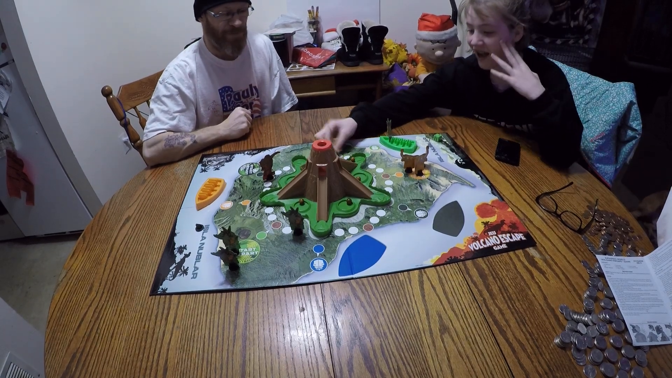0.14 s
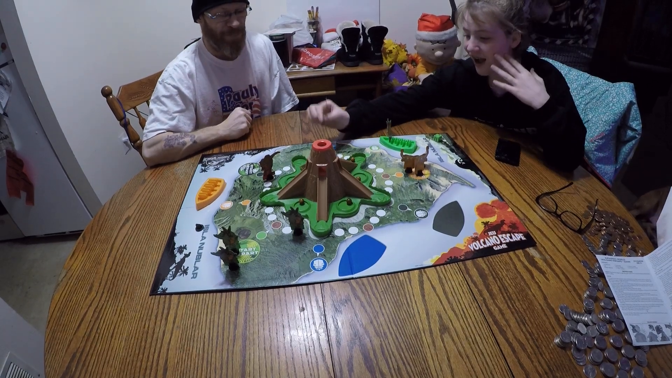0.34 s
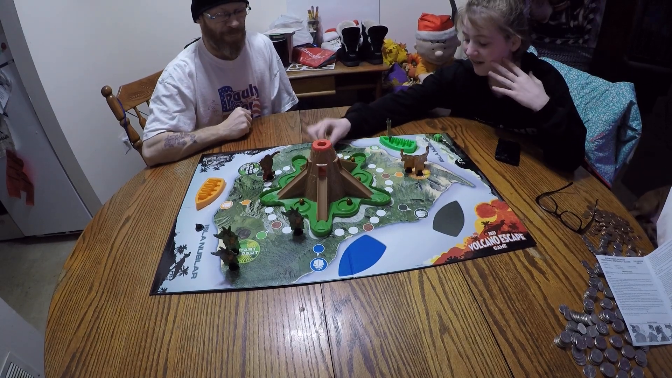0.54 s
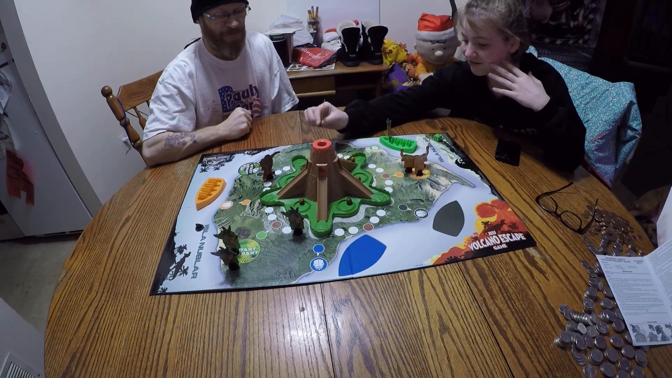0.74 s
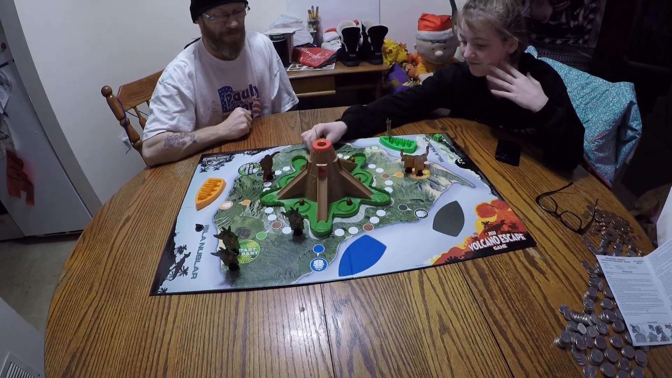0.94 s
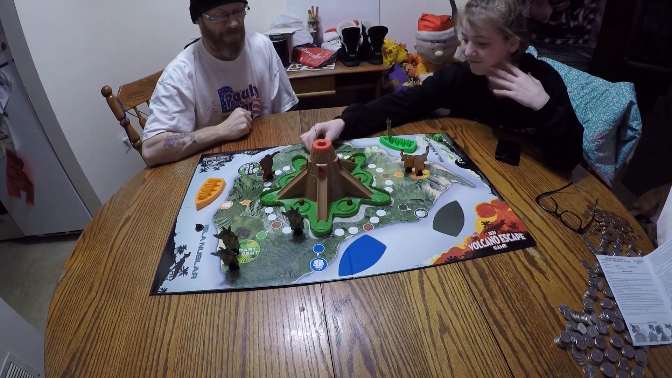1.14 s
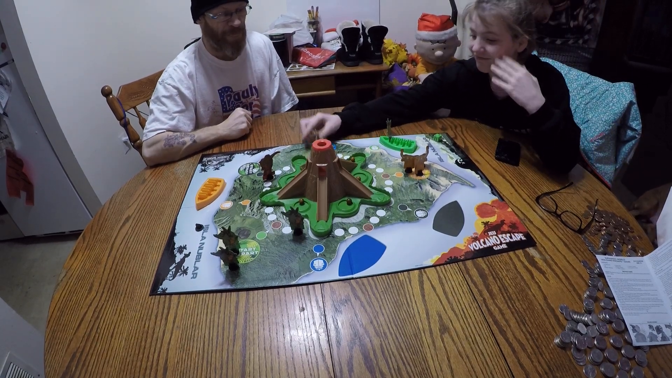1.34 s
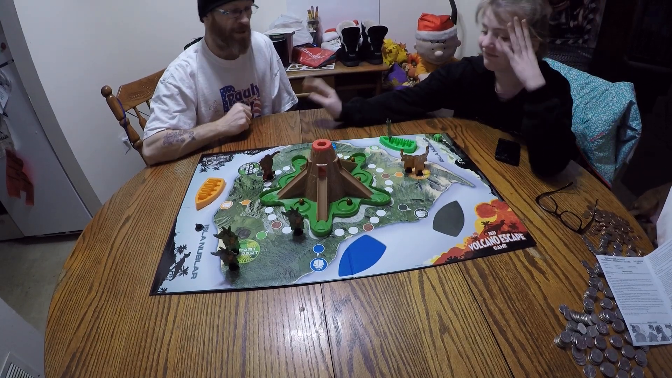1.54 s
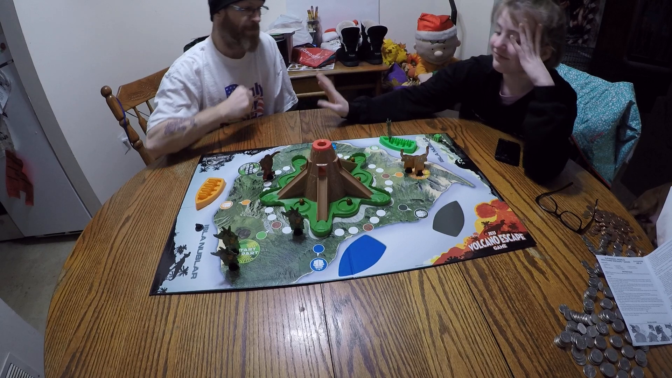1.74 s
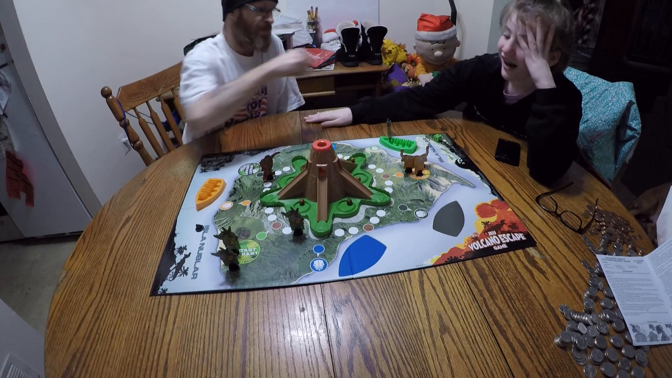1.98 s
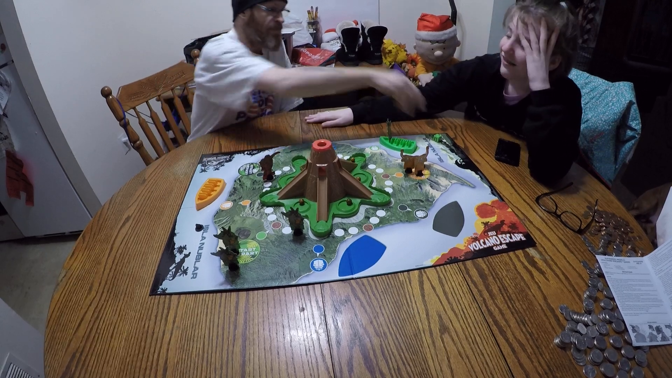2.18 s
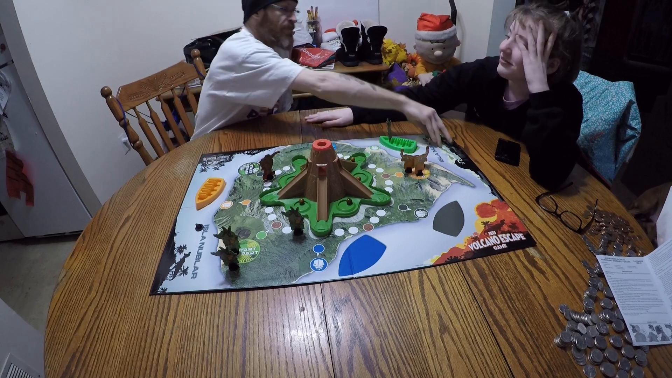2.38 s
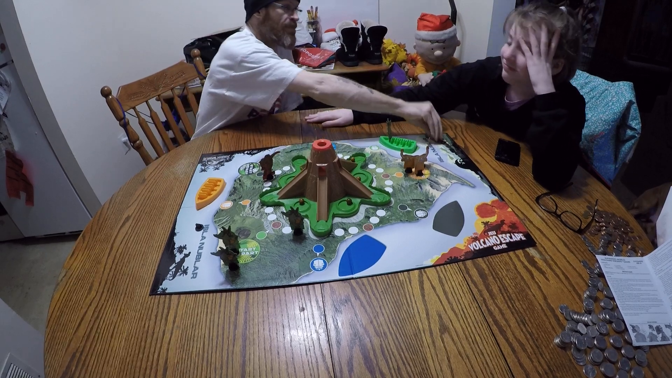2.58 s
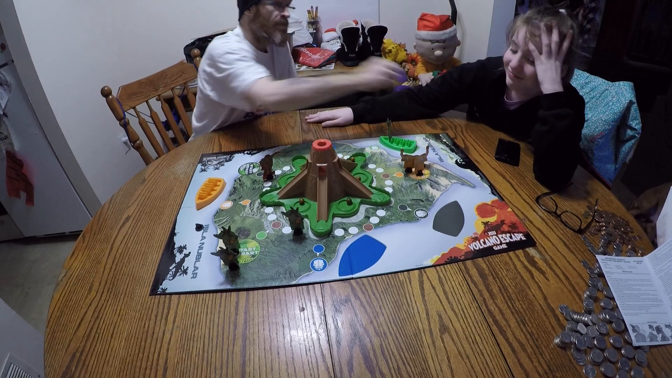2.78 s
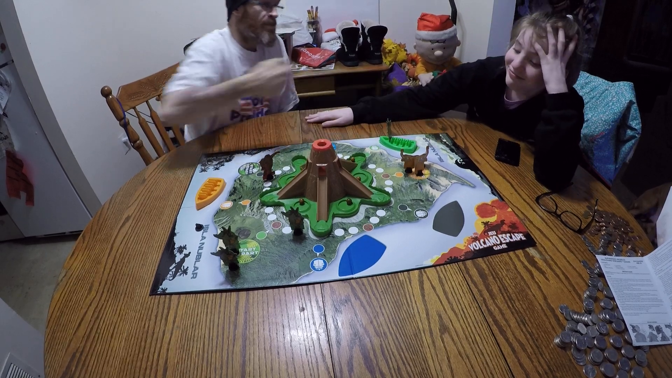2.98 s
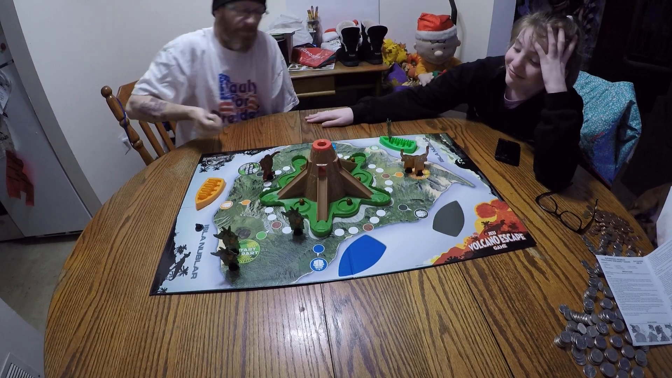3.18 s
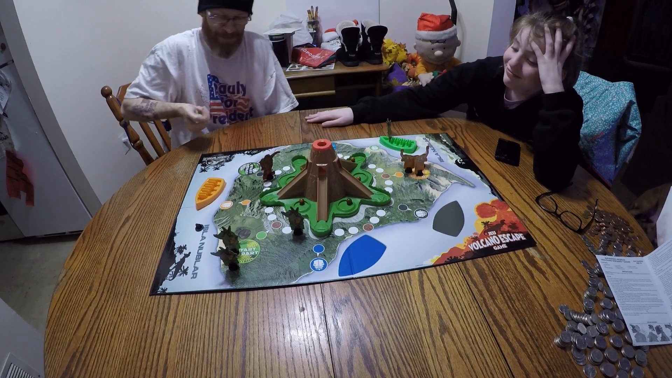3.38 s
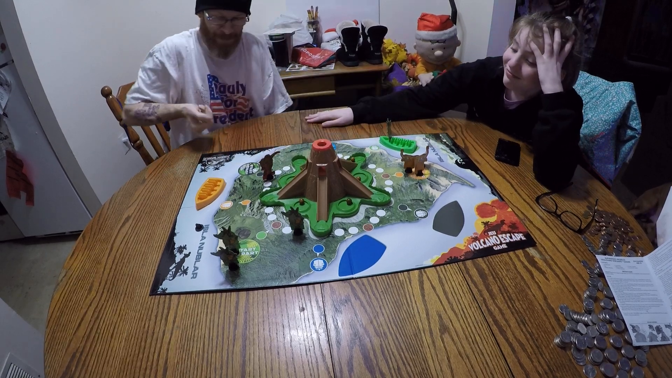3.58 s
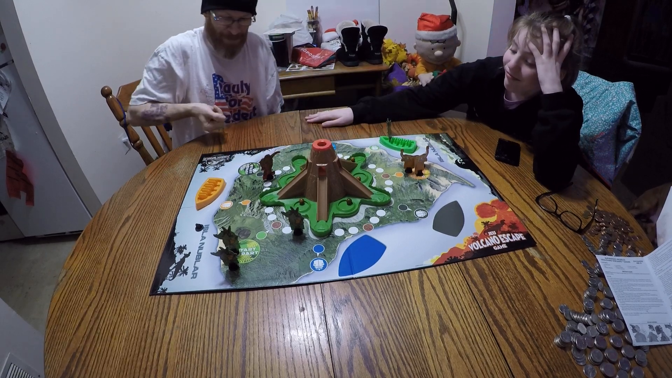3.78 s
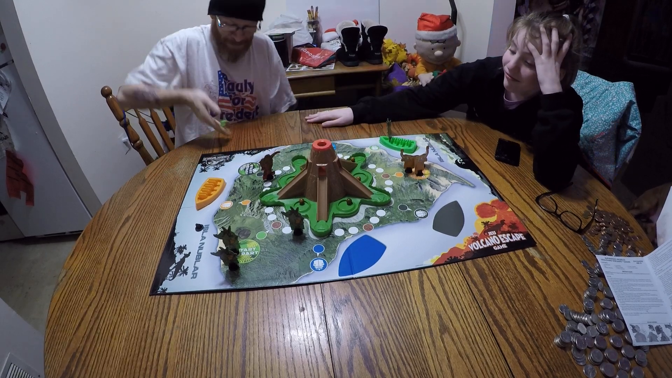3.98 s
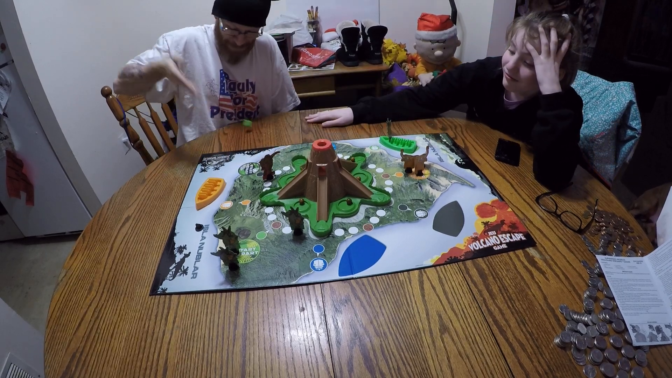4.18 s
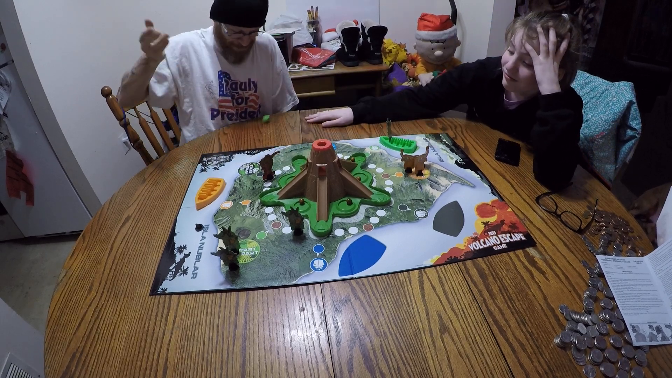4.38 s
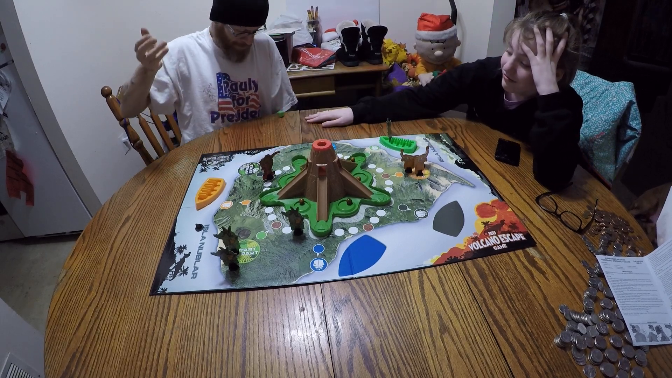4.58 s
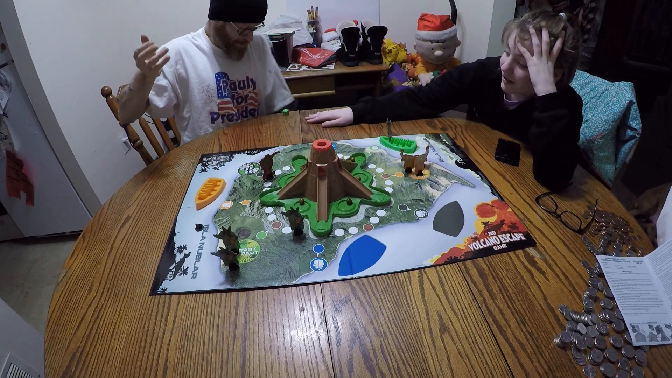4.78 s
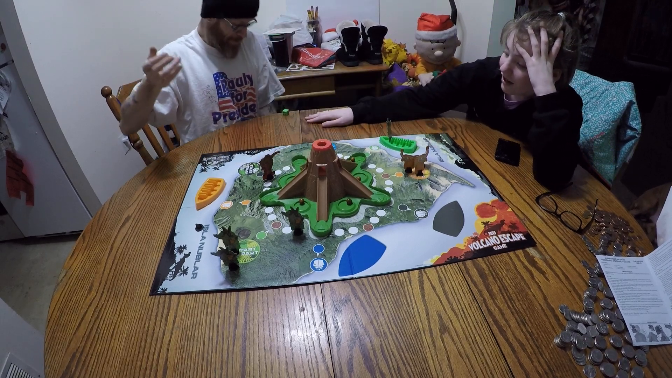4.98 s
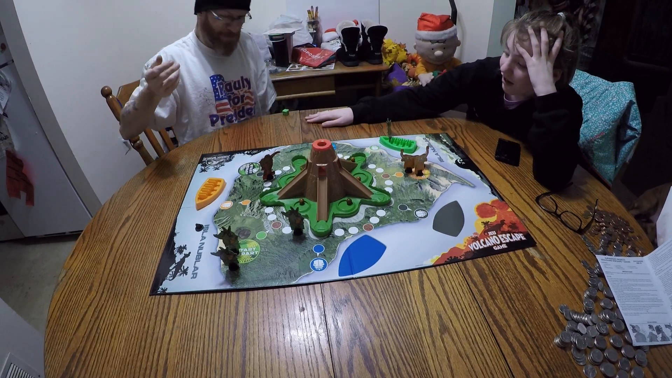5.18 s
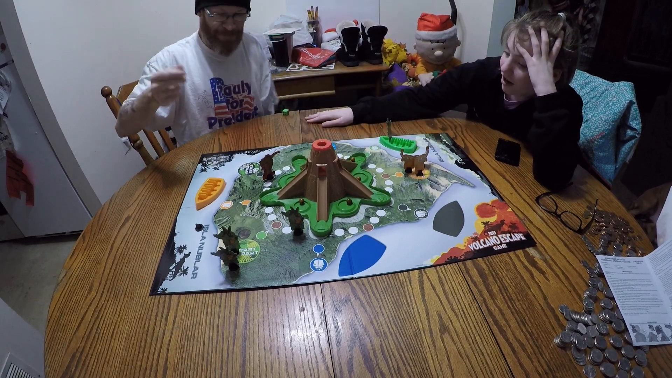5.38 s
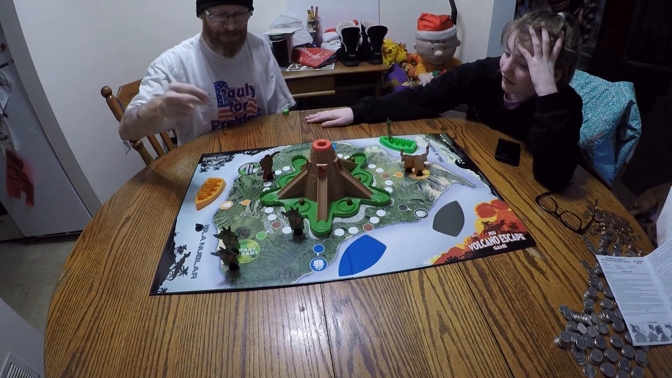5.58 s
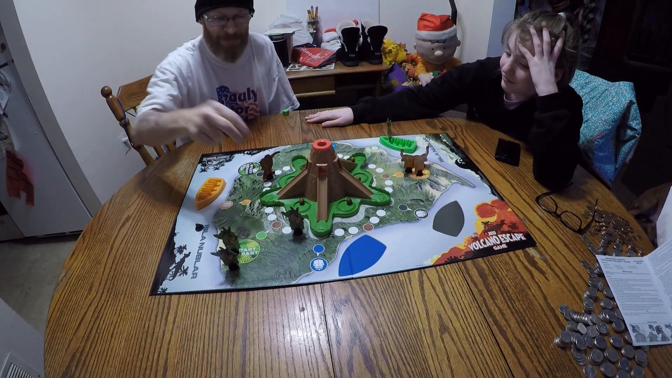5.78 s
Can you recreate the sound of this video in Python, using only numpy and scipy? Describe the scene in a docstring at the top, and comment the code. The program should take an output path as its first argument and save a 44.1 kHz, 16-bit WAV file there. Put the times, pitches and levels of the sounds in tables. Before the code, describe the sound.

A small, quiet room at home with a faint low hum, soft rumble and a very thin hiss throughout. Near 0.1 s a sleeve brushes softly with faint taps. A plastic pawn steps on the board at 0.5 s, with a low thud beneath, and more clearly at 0.9 s, each a small double click with a woody ring. From about 1.6 s come dull hand and forearm knocks and cloth rustle, strongest near 1.9 s, where the table shudders deeply; smaller muffled bumps follow at 2.3, 2.4 and 2.7 s. Then only room tone until 4.1 s, when a hard die strikes bare wood, by far the loudest sound. It bounces at 4.25, 4.33 and 4.39 s, weakening, then rolls with a short hollow rumble and ticks from about 4.45 to 4.75 s, with small clacks near 4.6 to 4.7 s. A short echo fades and the quiet hum remains to the end.

```python
"""Board game on a wooden table

A plastic pawn is stepped along the board; dull knocks of hands and forearms, and one under a pawn step,
sound on the table, which shudders. Sleeves brush past; a die bounces, rolls, clacks and rocks to rest.
Contacts are decaying noise bands beside ringing modes of the table top; thuds are damped sines.
Slow modes of the whole table give the shudder, shaped noise the cloth, and the small room hums faintly."""
import sys
import numpy as np
from scipy import signal
from scipy.io import wavfile

SR = 44100
rng = np.random.default_rng(int(sys.argv[2]) if len(sys.argv) > 2 else 0)


def int16_out(signal):
    """Quantize to a 16-bit WAV file."""
    q = np.round(np.clip(np.atleast_2d(signal).T, -1, 1) * 32767)
    wavfile.write(sys.argv[1], SR, q.astype(np.int16))


N = 256920
TIME = np.arange(N) / SR
AGE = np.arange(SR // 2) / SR   # time since a contact (s)
EDGES = np.geomspace(18, 17000, 29)   # band limits (Hz)
CENTRES = np.sqrt(EDGES[1:] * EDGES[:-1])
BANK = [signal.butter(2, band, "band", fs=SR, output="sos") for band in zip(EDGES, EDGES[1:])]

# Bounces of the die on the bare table top.
# Each row: start in seconds, clack level in dB, contact hardness as a low-pass cutoff in Hz.
DIE_BOUNCES = [(4.1056, -6.5, 7840), (4.251, -8.5, 3560), (4.326, -10.5, 5980), (4.3879, -13.5, 6600),
               (4.4505, -20, 4100), (4.6009, -18, 7400), (4.6536, -25, 4400), (4.717, -30, 3500)]
# Steps of the pawn on the board.
# Each row: start in seconds, clack level in dB, contact hardness (cutoff) in Hz, table ring in dB.
PAWN_TAPS = [(.139, -43, 3000, -46), (0.4986, -25, 5730, -32), (.8922, -21, 6900, -19.5),
             (1.576, -42, 2380, -40), (1.855, -41.5, 4500, -30), (2.445, -44.5, 3000, -57)]
# Dull thuds on the table: hands and arms landing, and the low thud under a pawn step.
# Each row: start in seconds, thud level in dB, contact hardness (cutoff) in Hz, thud pitch in Hz.
DULL_KNOCKS = [(.117, -37.5, 550, 380), (.231, -40, 1680, 272), (.501, -24, 480, 251),
               (.663, -41, 900, 248), (1.584, -31.5, 720, 363), (1.823, -40.5, 1900, 300),
               (1.85, -34, 1400, 297), (1.908, -26.5, 550, 332), (1.933, -33, 2700, 330),
               (1.9386, -21, 1650, 200), (2.31, -39, 700, 282), (2.433, -26.5, 332, 336),
               (2.702, -36, 450, 207)]
# Modes of the table top, which each kind of contact stirs differently.
# Each row: frequency in Hz, T60 in seconds, level in dB for the pawn, for the die, for the dull knocks.
TOP_MODES = [(164.7, 0.2484, -40, -27, -18), (249, 0.19, -19.5, -19, -16), (274.8, 0.23, -14.5, -26.5, -9),
             (387.2, 0.21, -24, -18, -23.5), (417, 0.2, -41, -16.5, -23), (505.6, 0.14, -16, -11, -1.5),
             (569, .12, 4.5, -5.5, -10), (597.2, .105, 5, 5.5, -1.5), (603, .5, -20, -58, -40),
             (624, 0.051, -11, -5.5, -0.5), (649, 0.13, -0.5, -6.5, -27.5), (709.7, 0.12, -1, -8.5, 1),
             (761, 0.121, -15, -16, -6.5), (886, 0.083, -30, -1.5, -1), (954, 0.081, -48, -6.5, -18),
             (1035.6, 0.1, -26, -12.5, -13), (1280, 0.15, -17, -18.5, -27), (1543, .11, -61, -14.5, -32),
             (1784, .12, -17, -16, -22), (2274, 0.06, -54, -21.5, -10), (2493, 0.1, -18, -22.5, -15),
             (2660, .15, -29, -15, -16), (3036, .12, -28, -19.5, -20.5)]
# Each spot's rows: frequency in Hz, level in dB, T60 in seconds.
PAWN_SPOT, DIE_SPOT, KNOCK_SPOT = (np.array(TOP_MODES)[:, [0, column, 1]] for column in range(2, 5))

# between its last bounces the die rolls, over this span (s)
ROLL_START_S, ROLL_STOP_S = 4.465, 4.745


def from_db(db):
    """Amplitude ratio: 20 dB is a factor of ten."""
    return 10 ** (np.asarray(db) / 20)


def at_hz(points, hz):
    """Interpolation along logarithmic frequency, held level beyond the end points."""
    known_hz, values = np.transpose(points)
    return np.interp(np.log(hz), np.log(known_hz), values)


def dying(t60):
    """Exponential decay: the level falls 60 dB in the time t60."""
    return from_db(-60 * AGE / t60)


def add(track, s, sound):
    """Superposition: a sound is summed in at time s."""
    start = max(round(s * SR), 0)
    track[start:start + len(sound)] += sound[:N - start]


def noise_bands(size):
    """Band-filtered noise: bands of about a third of an octave, each of rms 1."""
    white = rng.standard_normal((2, size + SR // 10))   # neighbouring bands take different noise
    bands = np.array([signal.sosfilt(sos, white[k % 2])[-size:] for k, sos in enumerate(BANK)])
    return bands / bands.std(axis=1, keepdims=True)


def band_gains(colour):
    """Spectral density times bandwidth gives band power; the total is set to 1."""
    gains = from_db(at_hz(colour, CENTRES)) * np.sqrt(np.diff(EDGES))
    return gains / np.linalg.norm(gains)


def ring(modes, spread_db, rise_s):
    """Modal superposition: damped sines swell as bending waves fill the wood."""
    hz, level_db, t60 = np.transpose(modes)
    gains = from_db(level_db + spread_db * rng.standard_normal(len(hz)))
    waves = np.sin(2 * np.pi * (hz[:, None] * AGE + rng.random((len(hz), 1))))
    swell = 1 - np.exp(-(AGE / rise_s) ** 2)
    return gains @ (waves * dying(t60[:, None])) * swell


def clack(colour, t60, crack_db, crack_t60, rise_cycles):
    """High modal density: a brief crack, then crowded short modes act as noise; the lows start later."""
    decay = dying(t60) + from_db(crack_db) * dying(crack_t60)
    rise = 1 - np.exp(-AGE * CENTRES[:, None] / rise_cycles)
    shape = decay * rise
    bands = noise_bands(len(AGE)) * shape
    # each band gets exactly the energy of its envelope
    bands *= np.linalg.norm(shape, axis=1, keepdims=True) / np.linalg.norm(bands, axis=1, keepdims=True)
    return band_gains(colour) @ bands


def contacts(rows, modes, colour, t60, crack_db, crack_t60, rise_cycles, swell_s, edge_db, order):
    """Impact excitation: a softer, longer touch loses its treble, in the clack and in the wood."""
    out = np.zeros(N)
    for s, clack_db, hardness_hz, ring_db in rows:
        blow = from_db(clack_db) * clack(colour, t60, crack_db, crack_t60, rise_cycles)
        wood = from_db(ring_db) * ring(modes, spread_db=3.5, rise_s=swell_s)
        softness = signal.butter(order, np.clip(hardness_hz, 100, .45 * SR), fs=SR, output="sos")
        add(out, s, signal.sosfilt(softness, blow + wood))
        add(out, s, from_db(edge_db) * blow)   # a hard corner keeps a trace of treble
    return out


def die_contacts(unevenness):
    """Impact series: the bounces, and the fading ticks of the corners while the die rolls."""
    # the wood's ring under a full-scale clack (dB), and the share of the clack's fall that it follows
    ring_top_db, ring_follows = -8.5, .58
    rows = [(s, db, hz, ring_top_db + ring_follows * db) for s, db, hz in DIE_BOUNCES]
    ticks_per_s, tick_db, fade_db_per_s, hardness_hz = 33, -21, 80, 2120
    tick_ring_db = -4.5   # the wood's ring relative to the tick
    for s in np.arange(ROLL_START_S, ROLL_STOP_S, 1 / ticks_per_s)[1:]:
        db = tick_db - fade_db_per_s * (s - ROLL_START_S)
        shift_s = unevenness * rng.uniform(-1.02, 1) / ticks_per_s
        rows.append((s + shift_s, db, hardness_hz, db + tick_ring_db))
    return rows


def die():
    """Hard impact: each bounce or tick clacks and rings the wood under the die."""
    # Spectrum of the die's clack. Each row: frequency in Hz, density in dB per Hz.
    die_colour = [(60, -17.5), (160, -16), (350, -8.5), (650, 6.5), (1150, -5), (1800, -0.5), (2700, 4.5),
                  (3700, -4), (5300, -3), (7200, -19.5), (10000, -19.5), (15000, -23)]
    return contacts(die_contacts(unevenness=.2), DIE_SPOT, die_colour, t60=.11, crack_db=-6.5,
                    crack_t60=0.012, rise_cycles=1.4, swell_s=0.0073, edge_db=-30.5, order=6)


def rolling(per_s, hardness_hz, jitter_db, belly_db):
    """Rolling excitation: rounded corners nudge the wood at uneven moments and keep it rumbling."""
    level_db, attack_s = -29.5, 0.022   # of one nudge; time to get going
    spot = DIE_SPOT.copy()
    spot[3, 1] += belly_db   # the die has travelled to where the fourth mode swings widest
    out = np.zeros(N)
    for s in np.arange(ROLL_START_S, ROLL_STOP_S, 1 / per_s):
        start_up = min((s - ROLL_START_S) / attack_s, 1)
        nudge = from_db(level_db + jitter_db * rng.standard_normal()) * start_up
        add(out, s + rng.random() / per_s, nudge * ring(spot, spread_db=1.0, rise_s=0.0065))
    softness = signal.butter(1, hardness_hz, fs=SR, output="sos")
    return signal.sosfilt(softness, out + 1e-18)   # the tiny offset avoids denormal numbers


def pawn_contacts():
    """Double impact: every step lands on the rim, then snaps onto the flat base."""
    # the base follows this much later (s), weaker (dB) and harder (ratio)
    settle_s, settle_db, harder = .0075, -2, 2.1
    flat = [(s + settle_s, db + settle_db, hz * harder, ring_db + settle_db)
            for s, db, hz, ring_db in PAWN_TAPS]
    return PAWN_TAPS + flat


def pawn():
    """Light impact: the pawn clacks and rings the wood under the board."""
    # Spectrum of the pawn's clack. Each row: frequency in Hz, density in dB per Hz.
    pawn_colour = [(60, 7), (130, 11.5), (230, 5.5), (400, 1.5), (700, 3.5), (1200, -1), (1900, -0.5),
                   (2800, 0.5), (4000, -11), (5500, -17.5), (8000, -29), (11000, -25), (15000, -51)]
    return contacts(pawn_contacts(), PAWN_SPOT, pawn_colour, t60=0.11, crack_db=7.5,
                    crack_t60=0.0094, rise_cycles=0.9, swell_s=0.014, edge_db=-34, order=3)


def knock_contacts():
    """Contact stiffness: the harder the touch behind a thud, the more it knocks on the wood."""
    # a bony touch knocks as loudly as it thuds, a softer one less; the table rings with the knock
    bony_hz, knock_db_per_octave, knock_ring_db = 1660, 7, 2
    rows = []
    for s, thud_db, hardness_hz, _ in DULL_KNOCKS:
        knock_db = thud_db + knock_db_per_octave * np.log2(hardness_hz / bony_hz)
        rows.append((s, knock_db, hardness_hz, knock_db + knock_ring_db))
    return rows


def knocks():
    """Soft impact: each dull touch knocks on the wood and rings it."""
    # Spectrum of the dull knocks. Each row: frequency in Hz, density in dB per Hz.
    knock_colour = [(60, 7.5), (200, -6), (350, -2.5), (520, -5), (720, 4), (880, -14.5), (1200, -16),
                    (2000, -14), (3000, -32), (6000, -9.5), (15000, -60)]
    return contacts(knock_contacts(), KNOCK_SPOT, knock_colour, t60=0.13, crack_db=-2.0,
                    crack_t60=0.037, rise_cycles=0.88, swell_s=0.0026, edge_db=-49, order=3)


def thuds(t60, rise_s):
    """Heavy damping: a dull bump rings for only a few cycles."""
    out = np.zeros(N)
    envelope = dying(t60) * (1 - np.exp(-(AGE / rise_s) ** 2))
    for s, level_db, _, hz in DULL_KNOCKS:
        add(out, s, from_db(level_db) * np.sin(2 * np.pi * hz * AGE) * envelope)
    return out


def jolts(rows, jolt_db, abrupt_hz):
    """Linear response: each blow shakes the table in proportion to its strength."""
    return [(s, db + jolt_db, abrupt_hz) for s, db, *_ in rows]


def shudders():
    """Rigid-body resonance: the table sways on its legs; a slow press stirs only its lowest modes."""
    # The whole table on its legs. Each row: frequency in Hz, level in dB, T60 in seconds.
    frame_modes = [(28.3, -5, 0.44), (35.98, -4, 0.54), (53.65, -6.5, .4), (67, -6, 0.46), (80, -3.5, 0.36),
                   (121, -24, .25), (193.3, -9, 0.14)]
    # An arm's weight coming down. Each row: start in seconds, shudder in dB, abruptness (cutoff) in Hz.
    leans = [(1.8, -29, 45), (1.94, -21.5, 60), (2.005, -26.5, 130), (2.142, -35.5, 90)]
    pawn_jolts = jolts(PAWN_TAPS, jolt_db=-4, abrupt_hz=46)
    die_jolts = jolts(DIE_BOUNCES, jolt_db=-27, abrupt_hz=65)
    out = np.zeros(N)
    for s, level_db, abrupt_hz in leans + pawn_jolts + die_jolts:
        sway = ring(frame_modes, spread_db=0.5, rise_s=0.015)
        slowness = signal.butter(2, abrupt_hz, fs=SR, output="sos")
        add(out, s, from_db(level_db) * signal.sosfilt(slowness, sway))
    return out


def sleeves():
    """Friction noise: cloth hisses softly, swelling and fading with the speed of each reach."""
    # Arms reaching across. Each row: fastest moment in seconds, half length in seconds, level in dB.
    reaches = [(.12, 0.13, -60), (1.69, 0.16, -62), (1.916, .08, -57.5), (2.446, 0.26, -63)]
    # Spectrum of the cloth. Each row: frequency in Hz, density in dB per Hz.
    sleeve_colour = [(100, -23.5), (800, -1), (2000, -7.5), (3500, -4), (5500, -10), (8000, -28.5),
                     (15000, -24)]
    speed = sum(from_db(db) * np.exp(-.5 * ((TIME - s) / half_s) ** 2) for s, half_s, db in reaches)
    return speed * (band_gains(sleeve_colour) @ noise_bands(N))


def room(x, wet_db, first_echo_s):
    """Diffuse reverberation: reflections off the near walls die at their own rate in each band."""
    # Reverberation of the room. Each row: frequency in Hz, T60 in seconds.
    room_t60 = [(100, 0.99), (500, 0.3), (900, 0.29), (1600, 0.33), (3000, 0.4), (6000, 0.42),
                (10000, 0.44), (15000, 0.28)]
    tails = noise_bands(len(AGE)) * dying(at_hz(room_t60, CENTRES)[:, None])
    onset = np.clip(AGE / first_echo_s - 1, 0, 1)
    response = np.sqrt(np.diff(EDGES)) @ tails * onset
    return x + from_db(wet_db) * signal.fftconvolve(x, response / np.linalg.norm(response))[:N]


def background(hiss_hz, hiss_width_hz, hiss_db):
    """Stationary noise and steady tones: room rumble, a low hum and a thin band of hiss."""
    # Spectrum of the still room. Each row: frequency in Hz, density in dB per Hz.
    air_colour = [(12, -31), (20, 1.5), (53, 1), (106, -13.5), (133, -17), (213, -15.5), (274, -6),
                  (298, -20), (324, -5.5), (404, -21.5), (478, -13), (811, -25), (881, -29), (5230, -34.5),
                  (15500, -46.5)]
    # Household hum. Each row: frequency in Hz, level in dB rms.
    hum_tones = [(48, -56.5), (120, -66), (143, -61.5), (188, -69), (272, -68), (330, -67.5), (382, -73)]
    air = from_db(-51) * (band_gains(air_colour) @ noise_bands(N))
    hum = np.zeros(N)
    for hz, db in hum_tones:
        hum += from_db(db) * np.sqrt(2) * np.sin(2 * np.pi * (hz * TIME + rng.random()))
    peak = signal.iirpeak(hiss_hz, hiss_hz / hiss_width_hz, fs=SR)
    hiss = signal.lfilter(*peak, rng.standard_normal(N))
    return air + hum + from_db(hiss_db) * hiss / hiss.std()


def scene():
    """Superposition: die, pawn and dull knocks on one table share the room's echo; the rest stays dry."""
    roll = rolling(per_s=75, hardness_hz=910, jitter_db=1.5, belly_db=12)
    bumps = thuds(t60=.055, rise_s=0.0015)
    table = room(die() + roll + pawn() + knocks() + bumps, wet_db=-10.0, first_echo_s=0.0072)
    still_room = background(hiss_hz=5183, hiss_width_hz=430, hiss_db=-75.0)
    return (table + shudders() + sleeves() + still_room)[None]


def record(dry):
    """Saturation and band limiting: the loudest peaks are rounded and the top is cut."""
    ceiling, cutoff_hz = 1.7, 15400
    rounded = ceiling * np.tanh(dry / ceiling)
    return signal.sosfilt(signal.cheby1(12, .2, cutoff_hz, fs=SR, output="sos"), rounded)


dry = scene()
out = record(dry)
int16_out(out)
```